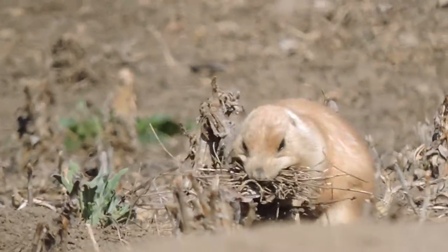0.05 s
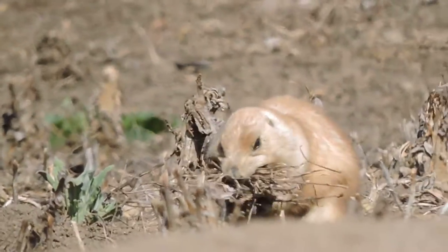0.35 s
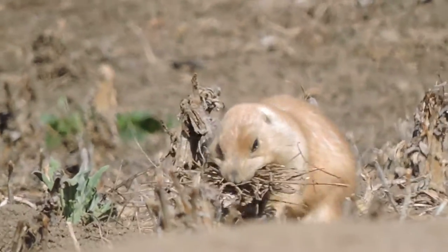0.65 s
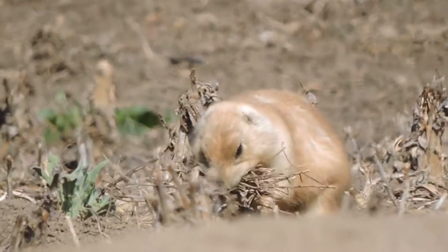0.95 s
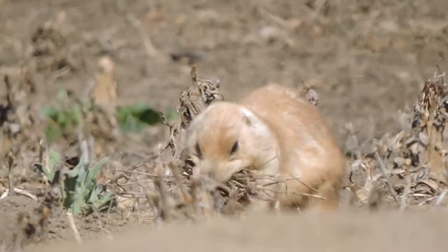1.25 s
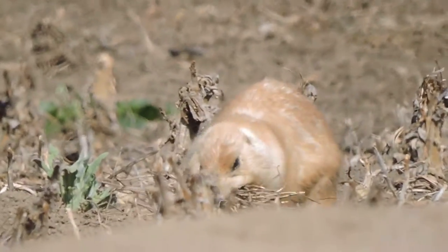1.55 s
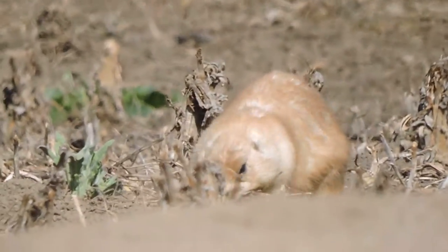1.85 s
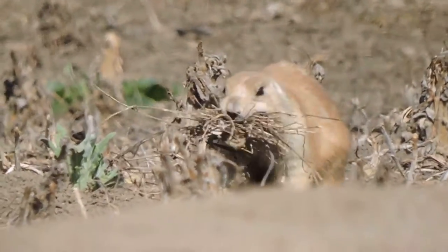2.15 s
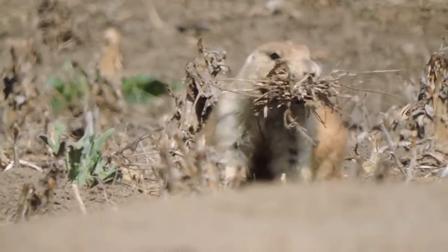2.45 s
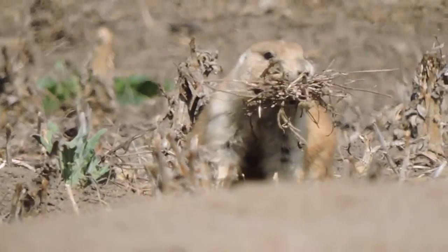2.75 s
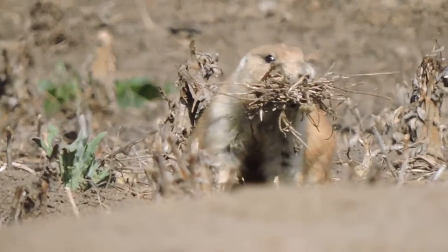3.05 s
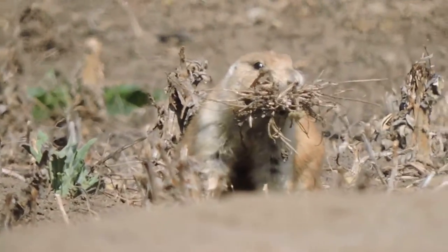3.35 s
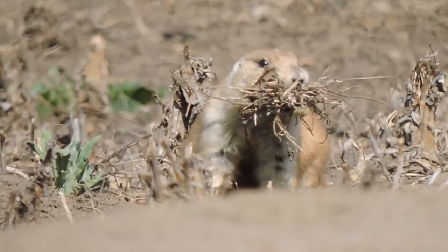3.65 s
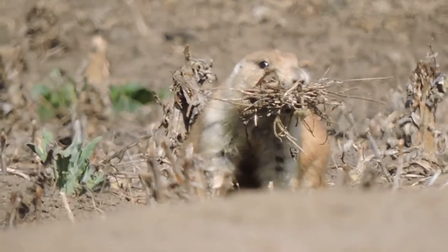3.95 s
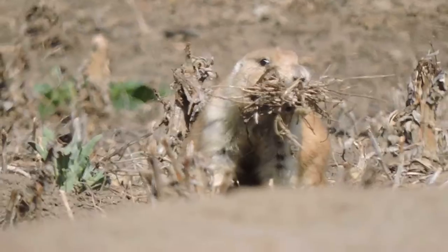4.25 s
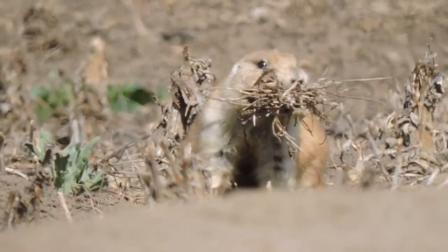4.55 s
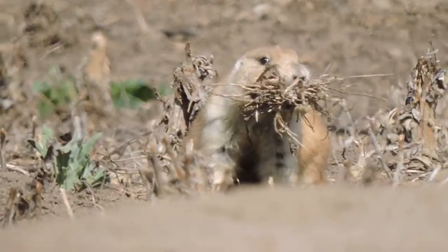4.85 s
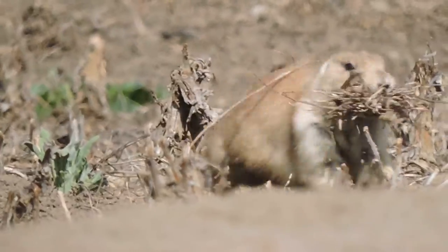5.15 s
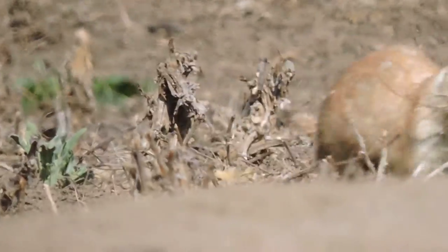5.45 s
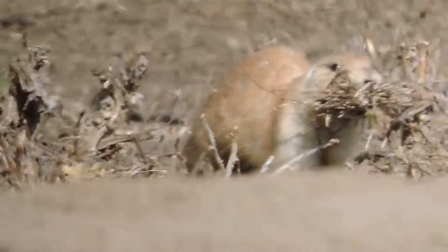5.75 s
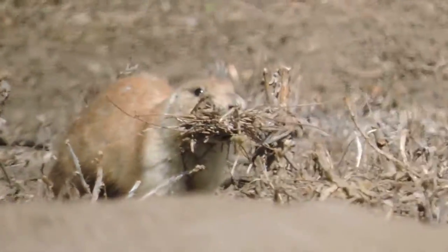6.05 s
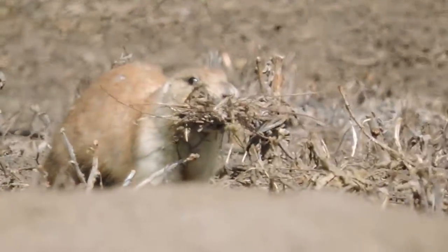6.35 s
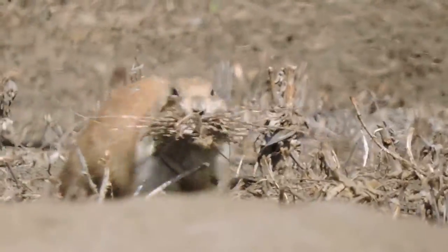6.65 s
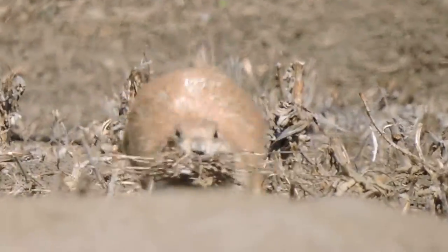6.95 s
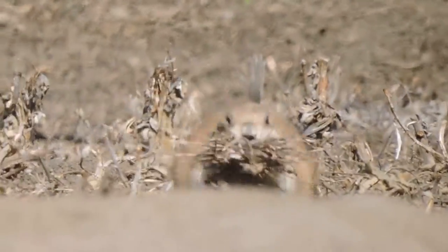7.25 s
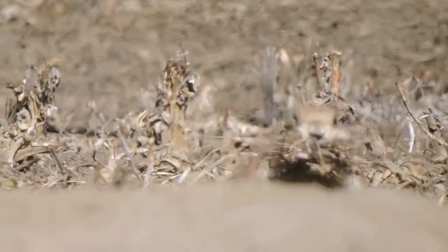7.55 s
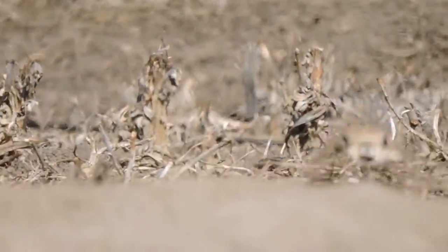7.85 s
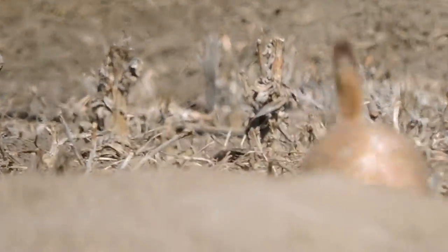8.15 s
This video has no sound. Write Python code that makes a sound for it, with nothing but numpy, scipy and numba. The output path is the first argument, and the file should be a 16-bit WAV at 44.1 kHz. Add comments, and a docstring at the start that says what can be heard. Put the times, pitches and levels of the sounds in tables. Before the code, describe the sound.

Low wind buffets the microphone, mostly on the left, while small birds whistle faintly over a far traffic hum.

```python
"""An open field on a gusty day. Wind buffets the left port of a camera microphone and only brushes the right.
Traffic and an engine hum lie far off, small birds whistle and squeal nearer, dry stalks snap close by.
The recorder's limiter snaps the gain down at each high crest of the rumble, which ticks, and lets it
creep back, so the background sinks under each gust and swells in the lulls."""
import sys
import numpy as np
from scipy import signal
from scipy.fft import rfft, irfft, next_fast_len
from scipy.io import wavfile
from scipy.ndimage import uniform_filter1d, map_coordinates
from numba import njit

SR = 44100
rng = np.random.default_rng(int(sys.argv[2]) if len(sys.argv) > 2 else 0)


def wrap_up_sound(samples):
    """Save the sound to the file named by the first command line argument, as 16-bit audio."""
    columns = np.atleast_2d(samples).T
    # keep every value between -1 and 1, then stretch to whole-number steps
    tamed = np.clip(columns, -1, 1)
    steps = np.round(tamed * 32767).astype(np.int16)
    wavfile.write(sys.argv[1], SR, steps)


N = 362502
TIME = np.arange(N) / SR


def undb(db):
    """Decibels to gain."""
    return 10 ** (np.asarray(db) / 20)


def walk(rate):
    """Random levels held 1 / rate s and smoothed twice; spread near 1."""
    hold = max(int(SR / rate), 1)
    steps = np.repeat(rng.standard_normal(N // hold + 1), hold)
    return 1.3 * uniform_filter1d(uniform_filter1d(steps, hold), hold)[:N]


def add(track, s, sound):
    """Mix a sound into a track from time s on."""
    i = int(np.clip(s * SR, 0, N))
    track[i:i + len(sound)] += sound[:N - i]


def colour(white, hz, db):
    """White noise shaped to a density given in dB per Hz."""
    size = next_fast_len(N)
    bins_hz = np.maximum(np.fft.rfftfreq(size, 1 / SR), 1)
    gain = undb(np.interp(np.log(bins_hz), np.log(hz), db))
    return irfft(rfft(white, size) * gain, size)[:N] * np.sqrt(SR / 2)


def swells(rows):
    """A smooth hump for each row of (time [s], length [s], height)."""
    out = np.zeros(N)
    for s, length, height in rows:
        near = np.abs(TIME - s) < length / 2
        out[near] += height * np.cos(np.pi * (TIME[near] - s) / length) ** 2
    return out


def airflow(gusts, buffets, db_per_doubling=24):
    """Pressure and eddy speed at a port: buffets ride on the slow wind, and stronger ones are faster."""
    times, gust_db, speed = np.transpose(gusts)
    buffet_db = swells(buffets)
    pressure = undb(np.interp(TIME, times, gust_db) + buffet_db)
    return pressure, np.interp(TIME, times, speed) * 2 ** (buffet_db / db_per_doubling)


# Turbulence right at the microphone, at eddy speed 1: (frequency [Hz], relative density [dB])
EDDY_SPECTRUM = [(10, -2.5), (25, -6), (60, 1), (130, 0.5), (200, -2.5), (300, -10), (500, -22.5),
                 (700, -34), (1000, -51), (2000, -77.5), (5000, -100)]
def rumble(speed, flurry, swirl, flutter_db, boom_db, boom_hz=141.3, boom_q=3.6):
    """Eddies blow past a port: faster air raises every frequency except a steady low resonance."""
    travelled = np.cumsum(speed * np.exp(swirl * (flurry - flurry.mean())))
    pattern = colour(rng.standard_normal(N), *np.transpose(EDDY_SPECTRUM))
    pressure = map_coordinates(pattern, [travelled], order=3, mode="mirror") * undb(flutter_db * flurry)
    pressure += undb(boom_db) * signal.lfilter(*signal.iirpeak(boom_hz, boom_q, fs=SR), pressure)
    # even out the power, so that the gusts set the strength
    pressure /= np.sqrt(uniform_filter1d(uniform_filter1d(pressure ** 2, SR // 16), SR // 32))
    # ordinary crests level off about 7.5 dB over the mean
    crests = uniform_filter1d(uniform_filter1d((pressure / undb(7.5)) ** 6, SR // 150), SR // 200)
    return pressure / (1 + crests) ** (1 / 6)


# The sharpest eddies on the left port: (time [s], relative peak [dB], core passage before stretch [s])
VORTICES = [(0.073, 16, 0.001), (0.112, 10, 0.0013), (0.225, 10, 0.0022), (0.292, 9.5, 0.0011),
            (0.45, 8.5, 0.0017), (0.496, 16, 0.0014), (0.522, 10, 0.0011), (0.556, 9.5, 0.001),
            (0.569, 12.5, 0.0011), (0.626, 13.5, 0.00097), (0.688, 9.5, 0.0018), (0.816, 8, 0.00093),
            (0.878, 12.5, 0.00098), (0.896, 11, 0.0011), (0.955, 15, 0.001), (0.993, 7, 0.0014),
            (1.079, 8, 0.0014), (1.105, 10.5, 0.0012), (1.194, 7.5, 0.001), (1.439, 10.5, 0.0015),
            (1.601, 11, 0.0014), (1.62, 9.5, 0.0018), (1.683, 2, 0.0014), (1.727, 10, 0.0012),
            (1.749, 13, 0.0016), (1.79, 14, 0.0011), (1.884, 15.5, 0.0012), (1.969, 8, 0.0012),
            (2.003, 10, 0.00096), (2.108, 9.5, 0.0012), (2.326, 7.5, 0.0014), (2.376, 10.5, 0.0013),
            (2.442, 8.5, 0.0012), (2.627, 11.5, 0.0012), (2.679, 11, 0.0014), (2.93, 9.0, 0.0014),
            (3.015, 12.5, 0.0011), (3.211, 9, 0.0011), (3.253, 10.5, 0.0014), (3.316, 12, 0.0016),
            (3.389, 10.5, 0.0013), (3.411, 11.5, 0.0011), (3.451, 14, 0.0017), (3.903, 11.5, 0.0019),
            (4.061, 9, 0.002), (4.2, 11, 0.0017), (4.414, 6.5, 0.0016), (4.619, 12.5, 0.0015),
            (4.881, 11.5, 0.0016), (4.994, 9.5, 0.0011), (5.006, 12.0, 0.0016), (5.033, 11.0, 0.0015),
            (5.109, 8.5, 0.0014), (5.127, 8.0, 0.0015), (5.176, 12, 0.0014), (5.216, 9, 0.0017),
            (5.275, 9.5, 0.0016), (5.417, 10.5, 0.00097), (5.476, 9.5, 0.0018), (5.796, 10.5, 0.0013),
            (5.892, 11, 0.0013), (5.921, 10.5, 0.0017), (5.934, 14.5, 0.0015), (5.947, 13.5, 0.0016),
            (5.956, 15, 0.0016), (5.967, 15, 0.0011), (5.978, 15.5, 0.0014), (5.989, 16.5, 0.0012),
            (6.026, 15, 0.00072), (6.082, 11, 0.0019), (6.101, 10.5, 0.0016), (6.128, 10.5, 0.0013),
            (6.16, 15.5, 0.0013), (6.18, 9, 0.0011), (6.237, 8, 0.00098), (6.368, 8.5, 0.001),
            (6.392, 13, 0.0015), (6.406, 12, 0.0013), (6.649, 9, 0.001), (6.791, 13.5, 0.0013),
            (7.036, 9.0, 0.0017), (7.082, 9.0, 0.0011), (7.139, 10, 0.0014), (7.335, 8.5, 0.0013),
            (7.347, 9.5, 0.001), (7.383, 10, 0.0014), (7.449, 12.5, 0.00097), (7.589, 10.5, 0.0015),
            (7.634, 12.5, 0.0015), (7.866, 11, 0.0013), (8.12, 9, 0.0013)]
def vortices(stretch):
    """A small vortex passes as a pointed dip in pressure between two shoulders."""
    out, half = np.zeros(N), SR // 70
    t = np.arange(-half, half + 1) / SR
    for s, db, core_s in VORTICES:
        u = t / (core_s * stretch)
        dip = (3 * u ** 2 / 2 - 1) / (1 + u ** 2 / 2) ** 3
        add(out, s - half / SR, dip * np.hanning(len(t)) * undb(db))
    return out


# Wind full on the left port: (time [s], relative level [dB], eddy speed [ratio])
LEFT_GUSTS = [(0, 1.5, 1.37), (.2, -3, .95), (.6, 2.5, 1.286), (1.15, 4.5, 1.347), (2.0, 1, 0.98),
              (2.3, 2, 0.87), (3.1, 0.5, 0.95), (3.57, 1, 1.27), (3.8, -8, 0.62), (4.2, -8.5, 0.61),
              (4.5, -13, 0.55), (4.68, -12.5, 0.62), (4.9, -12, 0.69), (5.2, 1.5, 0.82), (5.45, 1, 0.91),
              (5.86, -10, 0.84), (5.985, -3, 1), (6.03, 3.5, 1.2), (6.24, 5, 1.405), (6.33, 3, 1.235),
              (6.54, -1, 1.05), (7.05, 1, 1.125), (7.5, -1, 1.064), (7.72, -2, 0.83), (7.95, -8.5, 0.77),
              (8.22, 1, 0.97)]
# Short buffets on that port: (time [s], length [s], level over the wind [dB])
LEFT_BUFFETS = [(0.136, 0.099, 3.5), (0.305, 0.1, 3), (0.627, 0.1, 3), (0.948, 0.085, 2.5),
                (2.639, 0.15, 4), (3.87, 0.13, 4), (4.138, .16, 5), (4.221, 0.11, 3), (4.4, 0.087, 8),
                (4.869, 0.072, 3), (5.023, .12, 2.5), (5.444, .12, 3), (5.952, 0.068, 7), (5.981, .035, 9),
                (6.164, 0.096, 4), (6.228, .07, 3.5), (6.391, 0.096, 2.5), (7.419, 0.2, 3),
                (7.643, .14, 5.5)]
def exposed_wind(knot_s, knot_height, vortex_db, displace_s):
    """Turbulence on the left port; each vortex displaces the rumble amid a knot of fast air."""
    pressure, speed = airflow(LEFT_GUSTS, LEFT_BUFFETS)
    flurry = .9 * walk(110) + swells([(s, knot_s, knot_height) for s, *_ in VORTICES])
    kept = np.maximum(1 - swells([(s, displace_s, 1) for s, *_ in VORTICES]), 0)
    turbulence = rumble(speed, flurry, swirl=.13, flutter_db=1.85, boom_db=-14.5)
    return pressure * (kept * turbulence + undb(vortex_db) * vortices(stretch=1.139))


# Wind in the lee, on the right port: (time [s], relative level [dB], eddy speed [ratio])
RIGHT_GUSTS = [(0, -13.5, 0.47), (.3, -10, 0.48), (.47, -22, 0.33), (2.0, -21.5, 0.29), (2.8, -13.5, 0.45),
               (3.6, -26.5, 0.32), (3.9, -16.5, .3), (4.7, -34.5, 0.26), (5.5, -27, 0.39),
               (6.0, -33.5, 0.54), (6.6, -21.5, 0.36), (7.5, -37, 0.34), (8.22, -34.5, 0.37)]
# Puffs that reach round to it: (time [s], length [s], level over the wind [dB])
RIGHT_PUFFS = [(0.689, 0.2, 17), (1.18, 0.21, 8.5), (1.703, 0.15, 11), (2.678, 0.16, 7.5),
               (4.029, 0.15, 6.5), (6.27, 0.082, 20.5), (8.052, .14, 10)]
def sheltered_wind():
    """Slower air brushes the right port with a softer, deeper rumble of its own."""
    pressure, speed = airflow(RIGHT_GUSTS, RIGHT_PUFFS)
    return pressure * rumble(speed, walk(35), swirl=0.19, flutter_db=0.0, boom_db=-14)


# Traffic and air, far across the field: (frequency [Hz], relative density left [dB], right [dB])
TRAFFIC_SPECTRUM = [(40, -58, -63.5), (150, -67, -65.5), (250, -70.5, -71.5), (390, -72.5, -80.5),
                    (570, -77, -88.5), (775, -71, -82), (1020, -69.5, -80), (1280, -74.5, -86),
                    (1620, -81.5, -86.5), (2200, -92.5, -94), (2940, -101, -101), (4620, -105, -105),
                    (6940, -107, -108.5), (15300, -116, -120)]
def far_traffic(db, apart, waver_db):
    """A wavering wash of noise, partly alike at both ports; the traffic lies to the left."""
    hz, *ports_db = np.transpose(TRAFFIC_SPECTRUM)
    shared = rng.standard_normal(N)
    level = undb(db + waver_db * walk(12))
    whites = (shared + apart * rng.standard_normal((2, N))) / np.hypot(1, apart)
    return level * np.array([colour(white, hz, port_db) for white, port_db in zip(whites, ports_db)])


def far_engine(hz, db, wander, waver_db):
    """The low firing note of a far engine, wavering on its way through the air."""
    phase = 2 * np.pi * np.cumsum(hz * (1 + wander * walk(9))) / SR
    return np.sin(phase) * undb(db + waver_db * walk(21))


def syllables(table, harmonics_db, flicker_db, quaver_hz=268):
    """Each bird syllable arcs through three pitches; a fast quaver makes some of them buzz."""
    out = np.zeros(N)
    flicker = undb(flicker_db * walk(110))
    quaver_phase = 2 * np.pi * np.cumsum(quaver_hz * (1 + 0.22 * walk(30))) / SR
    quaver = np.sin(quaver_phase) + 0.55 * walk(900)
    for s, length, start_hz, middle_hz, end_hz, db, depth in table:
        u = np.linspace(0, 1, int(max(length, .01) * SR))
        here = (int(s * SR) + np.arange(len(u))) % N
        arc_hz = np.polyval(np.polyfit([0, .5, 1], [start_hz, middle_hz, end_hz], 2), u)
        phase = 2 * np.pi * np.cumsum(arc_hz * (1 + depth * quaver[here])) / SR
        tone = sum(undb(h) * np.sin(k * phase) for k, h in enumerate(harmonics_db, 1))
        envelope = np.abs(np.sin(np.pi * u)) ** 0.5
        add(out, s, tone * envelope * flicker[here] * undb(db))
    return out


# Small birds some way off: (time [s], length [s], start [Hz], middle [Hz], end [Hz],
# relative level [dB], quaver depth [share of pitch])
WHISTLES = [(1.95, 0.078, 9190, 9160, 8970, -75.5, 0.0054), (3.25, 0.021, 6240, 6140, 5993, -68.5, 0.01),
            (3.33, 0.25, 7900, 7950, 8120, -76.5, 0.0053), (3.89, 0.047, 4750, 4250, 3800, -64, 0.017),
            (3.925, .039, 6000, 5770, 5540, -71, 0.023), (4.2, 0.11, 6940, 7060, 7100, -71, 0.011),
            (4.27, 0.057, 8120, 8200, 7900, -77, .008), (4.5, .12, 9364, 8900, 7985, -82, .01),
            (4.79, 0.086, 7930, 6204, 5355, -68, 0.023), (4.92, 0.21, 5880, 7350, 8230, -71.5, 0.023),
            (5.25, 0.08, 5800, 5500, 5763, -69.5, 0.0098), (5.32, 0.085, 9000, 8450, 7540, -80.5, 0.011),
            (5.35, 0.094, 5730, 6160, 6500, -63.5, .02), (5.455, 0.089, 5879, 4795, 4092, -62, .04),
            (5.645, 0.087, 8606, 6400, 5600, -66.5, 0.027), (5.795, .15, 6006, 7099, 7677, -66, 0.015),
            (5.87, 0.11, 5599, 5960, 5550, -70.5, 0.015), (6.055, 0.092, 5679, 5900, 6300, -62, .014),
            (6.6, .15, 6783, 7725, 8280, -70.5, 0.024), (7.175, 0.086, 8550, 8286, 8270, -68.5, 0.0057),
            (7.24, 0.058, 8880, 7900, 6672, -69, .014), (7.293, .065, 6536, 5500, 5313, -57, .018),
            (7.37, 0.094, 5606, 5890, 6080, -60, 0.019), (7.445, 0.062, 6130, 7190, 7600, -60, 0.044),
            (7.495, 0.072, 7565, 7955, 8280, -65, 0.01), (7.7, .14, 9204, 9090, 8340, -73, 0.0059),
            (8.02, 0.074, 8307, 7800, 7292, -79, .014), (8.11, .12, 5950, 5542, 5393, -75, 0.015)]
def bird_whistles(db):
    """High whistled syllables without overtones."""
    return undb(db) * syllables(WHISTLES, [0], flicker_db=3.0)


# A lower-voiced bird some way off: columns as in WHISTLES
SQUEALS = [(2.205, 0.071, 2300, 2150, 2043, -76, 0.011), (2.785, 0.071, 2280, 2125, 1905, -67.5, .01),
           (3.625, .16, 1860, 2123, 2006, -70.5, .012), (3.68, .04, 1460, 1426, 1356, -64, 0.0099),
           (3.865, .115, 1570, 1840, 1830, -62.5, 0.022), (3.97, .11, 1685, 1466, 1303, -67.5, .02)]
# Its harmonics, from the first up: (relative level [dB])
SQUEAL_HARMONICS = [-1, 3.5, 0, -20.5, -13]
def bird_squeals(db):
    """Squeals made reedy by strong second and third harmonics."""
    return undb(db) * syllables(SQUEALS, SQUEAL_HARMONICS, flicker_db=2.5)


def ground_scatter(direct, db, decay_s):
    """Ground and stalks scatter a short tail to each port, behind the direct sound."""
    t = TIME[:SR // 3]
    tails = rng.standard_normal((2, len(t))) * np.exp(-t / decay_s)
    scattered = [signal.fftconvolve(direct, tail / np.linalg.norm(tail))[:N] for tail in tails]
    return direct + undb(db) * np.array(scattered)


# Dry stalks near the microphone: (time [s], level before filtering [dB], band [Hz], decay [s])
STALK_SNAPS = [(4.308, -41, 3946, 0.0038), (4.35, -58, 9060, .011), (4.415, -45.5, 7930, .006)]
def stalk_snaps():
    """Each stalk snaps with a short burst of bright noise."""
    out, t = np.zeros(N), TIME[:SR // 10]
    for s, db, hz, decay_s in STALK_SNAPS:
        band = signal.butter(1, [hz / 1.7, min(hz * 1.1, SR / 2 - 1)], "band", fs=SR, output="sos")
        noise = signal.sosfilt(band, rng.standard_normal(len(t)))
        add(out, s, undb(db) * noise * np.exp(-t / decay_s))
    return out


@njit
def ride_gain(peak, top, snap, fall, rise):
    """Gain snaps down as the output passes the top, falls while it stays over, then climbs back to 1."""
    out, over = np.empty(len(peak)), False
    gain = min(1., top / peak[:2000].max())
    for i in range(len(peak)):
        was_over, over = over, peak[i] * gain > top
        if over:
            gain *= fall if was_over else snap
        else:
            gain = min(1., gain * rise[i])
        out[i] = gain
    return out


def limiter(x, top_db, snap_db, fall_db_per_s, regained_db, smooth_hz=3000):
    """One gain for both channels; its slightly rounded drop puts a corner in each high crest: a tick."""
    peak = np.abs(x).max(axis=0)
    gain = ride_gain(peak, undb(top_db), undb(-snap_db), undb(-fall_db_per_s / SR), undb(regained_db))
    pole = np.exp(-2 * np.pi * smooth_hz / SR)
    return x * signal.lfilter([1 - pole], [1, -pole], gain)


def creep(db_per_s, step_db):
    """Decibels regained at each sample: small, unevenly timed steps that crackle finely."""
    climbed_db = np.cumsum(undb(2.5 * walk(300))) * db_per_s / SR
    return step_db * np.diff(np.floor(climbed_db / step_db), prepend=0)


def scene():
    """Separate wind on each port, over far traffic, an engine, birds and nearby stalks."""
    left = exposed_wind(knot_s=.022, knot_height=.5, vortex_db=0.62, displace_s=.0045)
    wind = undb(-2.0) * np.array([left, sheltered_wind()])
    traffic = far_traffic(db=1.5, apart=1.0, waver_db=1.0)
    engine = far_engine(hz=95.5, db=-32.5, wander=0.0087, waver_db=1.5)
    birds = ground_scatter(bird_whistles(db=3.0) + bird_squeals(db=-1.5), db=-3.5, decay_s=0.018)
    return wind + traffic + engine + birds + stalk_snaps()


def record(dry):
    """A slow limiter rides the wind, a quick one nips each crest, the rest clips; high treble is cut."""
    slow_release = creep(db_per_s=31.5, step_db=0.09)
    quick_release = np.full(N, 451.5 / SR)  # 451.5 dB per second
    held = limiter(dry, top_db=-6.5, snap_db=0.1869, fall_db_per_s=1200, regained_db=slow_release)
    nipped = limiter(held, top_db=-5.5, snap_db=0.3947, fall_db_per_s=2800, regained_db=quick_release)
    lowpass = signal.ellip(8, .2, 70, 15800, fs=SR, output="sos")
    return signal.sosfilt(lowpass, np.clip(nipped, -1, 1))


dry = scene()
out = record(dry)
wrap_up_sound(out)
```